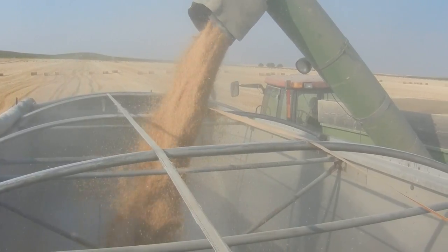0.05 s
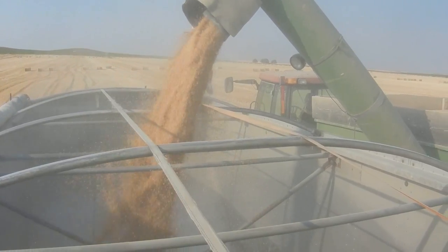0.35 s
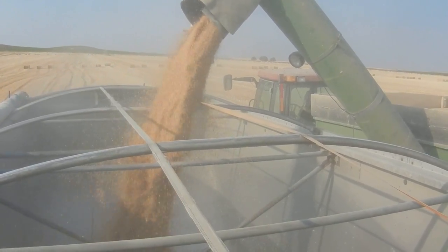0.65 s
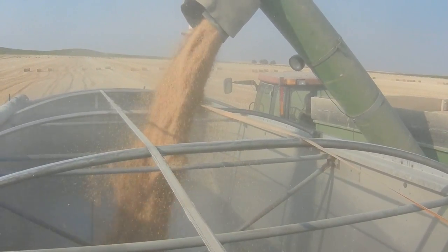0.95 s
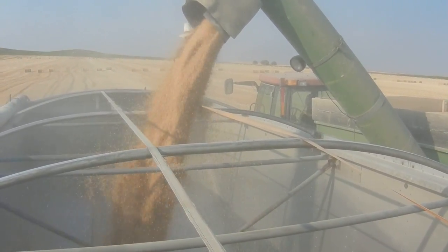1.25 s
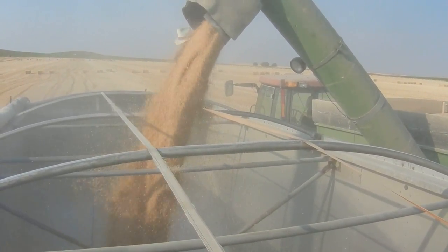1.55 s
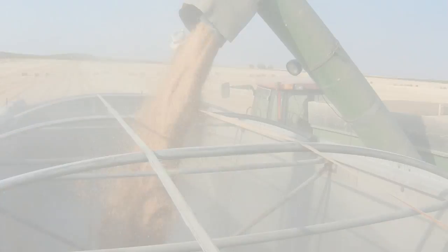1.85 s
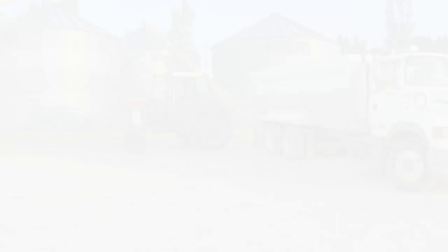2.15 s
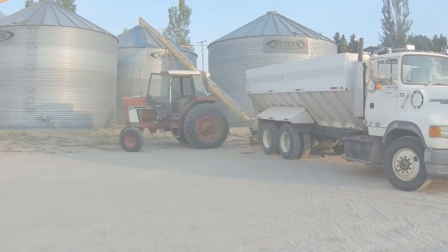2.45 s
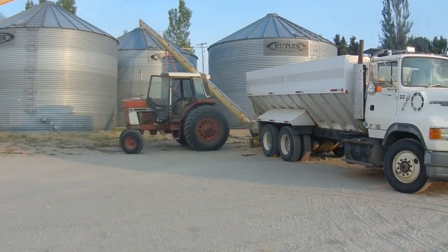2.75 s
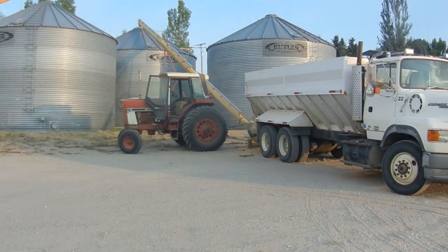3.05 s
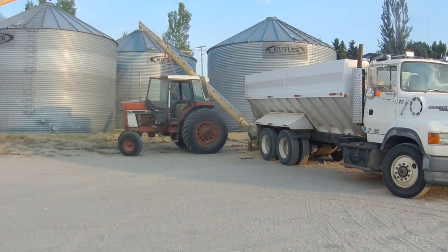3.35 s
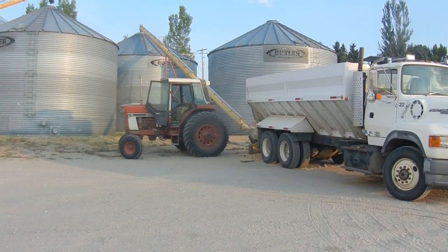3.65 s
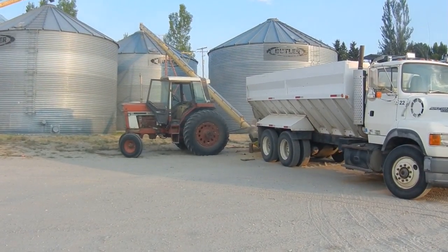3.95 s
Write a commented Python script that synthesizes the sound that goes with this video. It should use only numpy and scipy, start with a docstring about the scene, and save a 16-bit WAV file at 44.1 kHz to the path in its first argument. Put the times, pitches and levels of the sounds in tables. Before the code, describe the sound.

Grain pours into a steel hopper from the start, a bright hiss with metallic ringing over a machine rumble and short, dull auger rubs. It fades out between 1.8 and 2.2 seconds. From about 2.3 seconds a diesel tractor fades in, booming and clattering steadily until 4 seconds while an auger hums and rubs in quick pulses. A few faint ticks sound, and a soft low bump near 2.7 seconds.

```python
"""At a steel hopper, grain streams in from an auger spout: kernels pelt the steel and make it ring,
the auger's screw rubs in short, dull bursts, and the machine that drives it rumbles. That fades out.
After a short gap a farmyard fades in, where a six-cylinder diesel tractor booms and clatters
at steady speed and turns a grain auger, whose drive hums and whose screw rubs its tube.
A few sharp ticks and one low bump sound in the yard."""
import sys
import numpy as np
from scipy import signal
from scipy.fft import rfft, irfft, next_fast_len
from scipy.io import wavfile
from scipy.ndimage import map_coordinates

SR = 44100
rng = np.random.default_rng(int(sys.argv[2]) if len(sys.argv) > 2 else 0)


def master(y):
    """Save y as 16-bit WAV."""
    cut = np.clip(np.atleast_2d(y).T, -1, 1)
    pcm = np.round(cut * 32767)  # scale
    wavfile.write(sys.argv[1], SR, pcm.astype(np.int16))


N = 176400


def amp(db):
    """Decibels to gain."""
    return 10 ** (np.asarray(db) / 20)


def unit(x):
    """Scale to rms 1."""
    return x / np.sqrt(np.mean(x ** 2) + 1e-20)


def along(points, hz):
    """Interpolate (freq_hz, value) points on a log axis."""
    freqs_hz, values = np.transpose(points)
    return np.interp(np.log(hz + 1), np.log(freqs_hz + 1), values)


def clock():
    """Sample times in seconds."""
    return np.arange(N) / SR


def noise_pair():
    """Two independent white noises."""
    return rng.standard_normal((2, N))


def wobble(rate_hz):
    """Smooth random curve, rms near 1, with knots at rate_hz."""
    return map_coordinates(rng.standard_normal(2000), [clock() * rate_hz + 2], mode="mirror")


def filtered(x, response):
    """Apply a frequency response."""
    size = next_fast_len(N + 8192)
    return irfft(rfft(x, size) * response(np.fft.rfftfreq(size, 1 / SR)), size)[..., :N]


def coloured(x, spectrum):
    """Shape x by (freq_hz, gain_db) points; rms 1."""
    return unit(filtered(x, lambda hz: amp(along(spectrum, hz))))


def ringing(drive, modes):
    """Driven resonances, each two band-passes in series."""
    def band(pitch_hz, width_hz):
        def response(hz):
            damping = 1j * hz * width_hz * 1.5  # 1.5 offsets the narrowing in series
            return (damping / (pitch_hz ** 2 - hz ** 2 + damping)) ** 2
        return unit(filtered(drive, response))
    return sum(amp(db) * band(pitch_hz, width_hz) for pitch_hz, width_hz, db in modes)


def stereo(pair, correlation, balance):
    """Mix two independent signals to left and right of given correlation and balance."""
    def mid_side(hz):
        angle = np.arccos(np.clip(along(correlation, hz), -1, 1)) / 2
        return np.array([np.cos(angle), np.sin(angle)])
    mid, side = filtered(pair, mid_side)
    left_right = np.array([mid + side, mid - side])
    return filtered(left_right, lambda hz: amp(np.outer([.5, -.5], along(balance, hz))))


def fader(points, full_db):
    """Gain along (time_s, level_db) points, 1 at full_db."""
    return amp(np.interp(clock(), *np.transpose(points)) - full_db)


def fade(silent_s, full_s):
    """Curved gain ramp, up or down."""
    return np.clip((clock() - silent_s) / (full_s - silent_s), 0, 1) ** 1.56


def impacts(per_s, spread_db):
    """Two streams of tiny random blows, a few much harder than the rest."""
    hit = rng.random((2, N)) < per_s / SR
    size = amp(spread_db * np.minimum(rng.exponential(size=(2, N)), 5))
    return unit(hit * size * rng.choice([-1, 1], (2, N)))


def thump(centre_s=2.69, pitch_hz=26, sigma_s=.014):
    """One soft, very low bump."""
    t = clock() - centre_s
    return amp(-22) * np.exp(-.5 * (t / sigma_s) ** 2) * np.sin(2 * np.pi * pitch_hz * t)


def ticks(t60_s=.003, highpass_hz=4500):
    """Short bright ticks, right of centre."""
    # ticks: start_s, level_db
    events = [(2.424, -39), (2.5575, -35), (2.791, -31), (3.3583, -30), (3.9253, -31)]
    track, t = np.zeros(N), np.arange(128) / SR
    highpass = signal.butter(2, highpass_hz, "high", fs=SR)
    for start_s, level_db in events:
        burst = rng.choice([-1, 1], len(t)) * amp(-60 * t / t60_s)
        track[round(start_s * SR):][:len(t)] += amp(level_db) * unit(signal.lfilter(*highpass, burst))
    return track * amp([[-2], [2]])


def auger(turn_hz=6.76, swell_db=3, hard_rub_s=3.122):
    """The drive hums and the screw rubs its tube, both harder once a turn and under load."""
    # drive tones: pitch_hz, level_db
    tones = [(61,-37.5),(115,-34.5),(418,-38.5),(589,-35.5),(623,-32),(633,-39),(684,-31),(690,-32.5),(738,-29.5),(772,-33.5),(799,-33),(806,-35.5),(819,-29.5),(846,-31),(853,-34),(880,-36)]
    # tube resonances: pitch_hz, width_hz, level_db
    tube_modes = [(630, 34, -33), (712, 84, -30.5), (821, 66, -26.5)]
    # loudness under load: time_s, level_db
    load = [(2.3,-1),(2.6,-2.5),(2.95,0.5),(3.12,3),(3.3,1),(3.55,1.5),(3.74,-4.5),(3.88,2.5),(4,2.5)]
    t = clock()
    swell = amp(swell_db * np.cos(2 * np.pi * turn_hz * (t - hard_rub_s)))
    hum = np.zeros(N)
    for pitch_hz, level_db in tones:
        phase = 2 * np.pi * (pitch_hz * t + rng.random()) + 0.38 * wobble(8)
        hum += amp(level_db) * np.sqrt(2) * np.sin(phase)
    rub = ringing(noise_pair(), tube_modes)
    return fader(load, full_db=0.5) * swell * (hum + rub)


def tractor(cycle_hz=13.196, cylinders=6, knock_depth=0.11):
    """Exhaust tones and boom; clatter that swells at each firing and partly repeats every cycle."""
    # engine tones: multiple of the two-turn cycle, level_db
    orders = [(5,-36), (6, -27), (8, -34.5), (10, -31.5), (11, -35), (12, -22.5), (13,-51), (14, -35),
              (16,-46), (17, -43.5), (38, -44.5), (54, -32), (58, -34.5), (74, -43.5), (80,-43), (90, -38),
              (94, -44.5), (96, -32), (108, -39), (111, -34.5), (121, -43.5)]
    # mechanical clatter spectrum: freq_hz, gain_db
    clatter_spectrum = [(100,-48),(190,-11.5),(275,-19.5),(354,-9),(455,-13.5),(537,-15.5),(620,-11),(840,-8.5),(965,-14),(1430,-14),(1620,-14.5),(1830,-20.5),(2050,-14),(2300,-15),(2480,-16.5),(2750,-18),(3200,-20),(3900,-26.5),(4400,-27.5),(5900,-29.5),(7600,-40.5),(8900,-42),(11500,-39.5),(15700,-50)]
    # clatter loudness: time_s, level_db
    clatter_levels = [(2.52,1.5),(2.61,-4.5),(2.71,0),(2.78,0),(2.9,-1.5),(3.1,2.5),(3.3,-1.2),(3.44,1),(3.66,-0.3),(3.73,-4),(3.88,1.5),(4,-1)]
    # engine cover resonances: pitch_hz, width_hz, level_db
    cover_modes = [(2088, 53, -37.5), (2238, 46, -35.5), (2303, 21, -38), (2470, 9.4, -43.5),
                   (2580, 16, -44), (2714, 50, -35), (2880, 17, -38.5), (4240, 68, -43.5)]
    # exhaust roughness spectrum: freq_hz, gain_db
    boom_spectrum = [(20,-24),(40,-17),(65,-7.5),(90,4),(125,-8),(165,1),(200,-5),(270,-12.5),(500,-59)]
    cycles = np.cumsum(cycle_hz * (1 + 0.000802 * wobble(6))) / SR
    knock = 1 + knock_depth * np.cos(2 * np.pi * cylinders * cycles)
    tones = np.zeros(N)
    for order, level_db in orders:
        peak = amp(level_db + 0.5 * wobble(10)) * np.sqrt(2)
        tones += peak * np.sin(2 * np.pi * (order * cycles + rng.random()))
    cycle_noise = irfft(np.exp(2j * np.pi * rng.random(2048)))
    repeating = map_coordinates(cycle_noise, [cycles * len(cycle_noise)], mode="grid-wrap")
    steady = tones + amp(-23) * coloured(repeating * knock, clatter_spectrum)
    steady_pair = np.array([steady, np.roll(steady, SR // 3)])  # the shift decorrelates the pair
    clatter = amp(-20) * coloured(knock * noise_pair(), clatter_spectrum)
    covers = ringing(knock * noise_pair(), cover_modes)
    boom = amp(-28.5) * coloured(noise_pair(), boom_spectrum)
    clatter_gain = fader(clatter_levels, full_db=-1) * amp(1.18 * wobble(35))
    return clatter_gain * (clatter + covers) + boom + steady_pair


def farmyard(right_lead_s=8e-6):
    """Tractor and auger in stereo; their sound reaches the right side slightly sooner."""
    # left-right likeness: freq_hz, correlation
    correlation = [(60,1),(400,.97),(950,1),(2400,0.97),(4000,0.83),(6000,0.38),(9000,0.48),(15000,0.49)]
    # balance: freq_hz, left_minus_right_db
    balance = [(60, -3.0), (180, -3.0), (550, -3.0), (1650, -3.5), (4970, -2.5), (15000, 7.5)]
    machines = stereo(tractor() + auger(), correlation, balance)
    return filtered(machines, lambda hz: np.exp(1j * np.pi * right_lead_s * np.outer([-1, 1], hz)))


def hopper_rumble(throb_hz=17.8, throb_db=0.9):
    """The drive drones and shakes the hopper."""
    # hopper and drive spectrum: freq_hz, gain_db
    spectrum = [(12, -52.5), (20, -23), (70, -2.5), (96, 3), (133, -1.5), (188, -1.5), (280, -9.5),
                (380, 2), (424, 1.5), (472, -2.5), (555, -7), (619, -17.5), (755, -8), (841, -12),
                (905, -6.5), (1010, -9.5), (1080, -18), (1350, -12.5), (1500, -19), (1950, -45),
                (3300, -120)]
    # drive drone: pitch_hz, width_hz, level_db
    drive_modes = [(59.3, 3.6, -40.5), (85.5, 2.8, -40), (115.3, 3.7, -44.5), (159.2, 23, -36.5),
                   (184.9, 5.3, -31), (391.3, 10.4, -38), (483, 15.4, -31)]
    throb = amp(throb_db * np.sin(2 * np.pi * throb_hz * clock()) + 0.93 * wobble(30))
    rumble = amp(-21) * coloured(noise_pair(), spectrum)
    return throb * (rumble + ringing(noise_pair(), drive_modes))


def auger_rubs():
    """The auger's screw rubs in short, dull, gritty bursts."""
    # rubs: centre_s, sigma_s, level_db
    rubs = [(0.126, .025, -22), (0.316, .02, -23), (0.637, 0.051, -24.5), (.97, 0.015, -16),
            (1.254, 0.0075, -16.5), (1.39, .016, -22.5), (1.523, 0.017, -21), (1.674, 0.02, -20.5),
            (1.816, .012, -19.5)]
    # rub spectrum: freq_hz, gain_db
    spectrum = [(200, -39), (500, 0), (950, 1.5), (1800, -4.5), (3200, -7), (6000, -30), (15000, -45)]
    envelope = sum(amp(level_db) * np.exp(-.5 * ((clock() - centre_s) / sigma_s) ** 2)
                   for centre_s, sigma_s, level_db in rubs)
    return envelope * coloured(impacts(per_s=4900, spread_db=2.7), spectrum)


def kernels():
    """Kernels pelt the hopper: the blows merge to a hiss and ring the steel."""
    # grain flow: time_s, level_db
    flow_levels = [(0.0, -20.5), (0.076, -18.5), (1.14, -19), (1.192, -19), (1.212, -20.5), (1.284, -18),
                   (1.72, -19)]
    # kernel-on-steel spectrum: freq_hz, gain_db
    spectrum = [(350,-43),(600,-7.5),(760,-6),(850,-10.5),(1050,-4),(2450,-6.5),(4060,-7.5),(5560,-2),(6400,-6.5),(7800,-6.5),(9000,-4),(11000,-7),(13400,-8.5),(14500,-4.5),(15700,-12.5)]
    # steel resonances: pitch_hz, width_hz, level_db
    steel_modes = [(5000, 80, -31), (5130, 17, -38), (5165, 12, -43), (5450, 12, -38.5), (5357, 14, -41),
                   (5600, 124, -31.5), (5860, 24, -44), (6095, 46, -42), (9600, 490, -42),
                   (14000, 380, -39), (15400, 320, -36.5)]
    flow = fader(flow_levels, full_db=-19) * amp(0.34 * wobble(7.04) + .6 * wobble(70))
    blows = impacts(per_s=9000, spread_db=1.57)
    hiss = amp(-15.5) * coloured(blows, spectrum)
    ring = amp(1.2 * wobble(21.7)) * ringing(blows, steel_modes)
    return flow * (hiss + ring)


def pour():
    """Grain falls into the rumbling hopper; narrow bass, wide treble."""
    # left-right likeness: freq_hz, correlation
    correlation = [(60,0.98),(150,0.93),(400,0.95),(650,0.86),(1000,0.87),(2400,.62),(4500,0.39),(6000,0.44),(7500,-0.032),(8900,-0.44),(10200,0.011),(15000,0.11)]
    # balance: freq_hz, left_minus_right_db
    balance = [(60, -1.5), (150, -2), (380, -2), (950, -2.5), (2380, -2.0), (5980, 0), (15000, 2)]
    return stereo(kernels() + hopper_rumble() + auger_rubs(), correlation, balance)


def scene(yard_start_s=2.256):
    """The pour fades out, the yard fades in."""
    yard = farmyard() * fade(silent_s=2.209, full_s=2.58) * (clock() > yard_start_s)
    return thump() + ticks() + yard + pour() * fade(full_s=1.765, silent_s=2.172)


def record(dry, top_hz=15850, edge_hz=150):
    """Steep low-pass."""
    return filtered(dry, lambda hz: np.clip((top_hz - hz) / edge_hz, 0, 1))


dry = scene()
out = record(dry)
master(out)
```